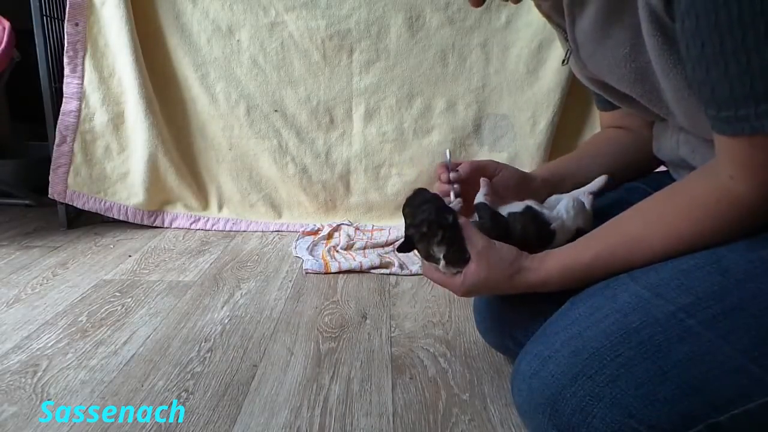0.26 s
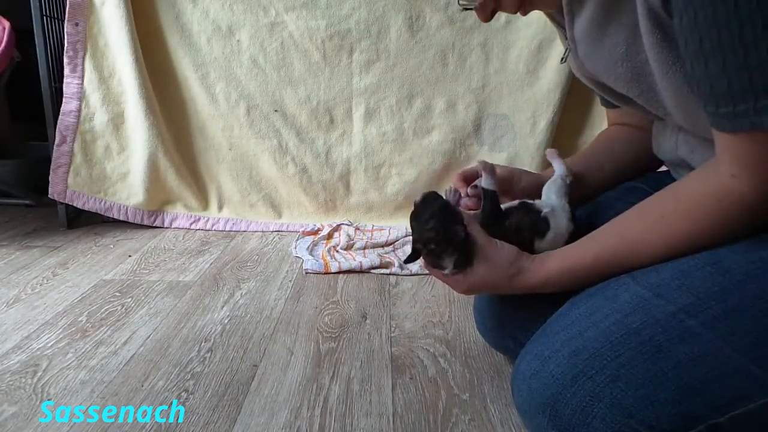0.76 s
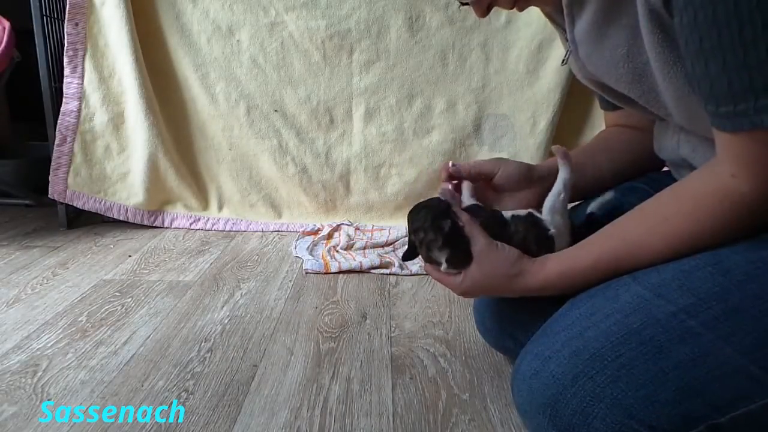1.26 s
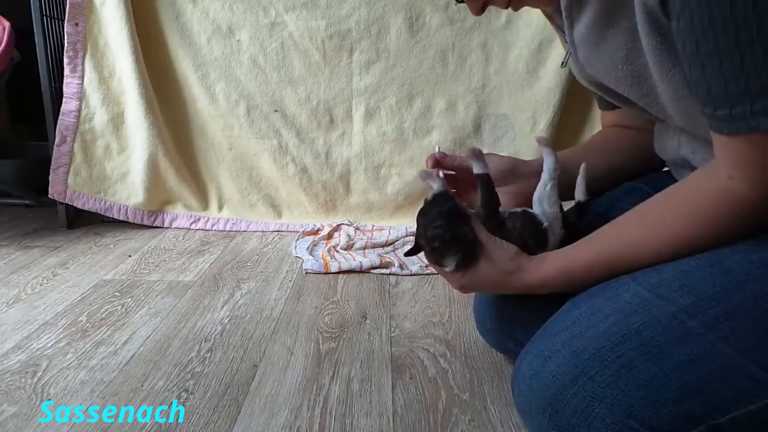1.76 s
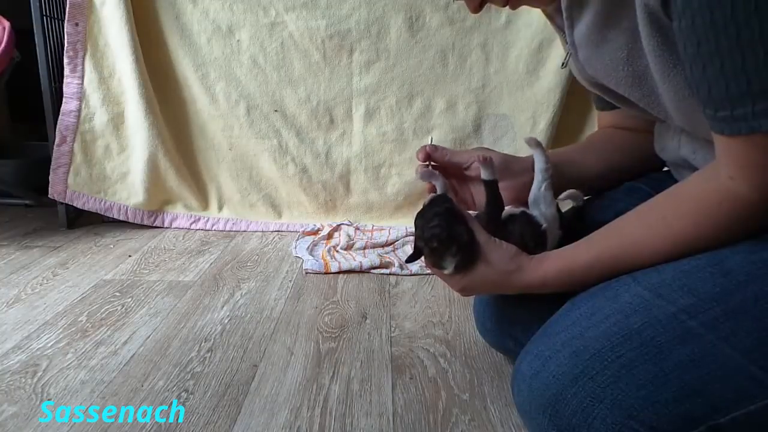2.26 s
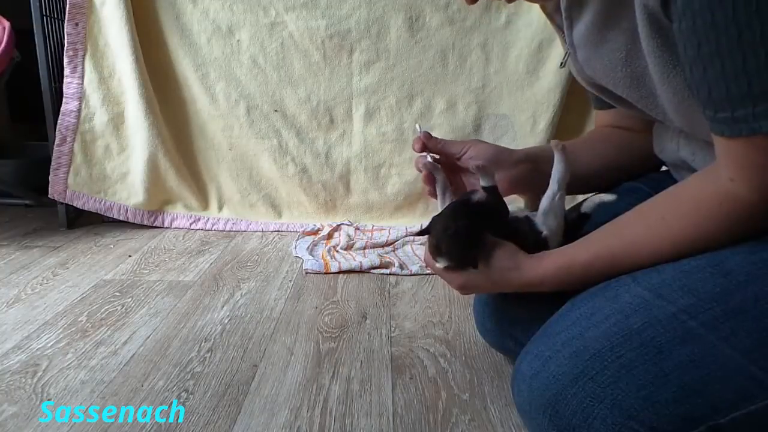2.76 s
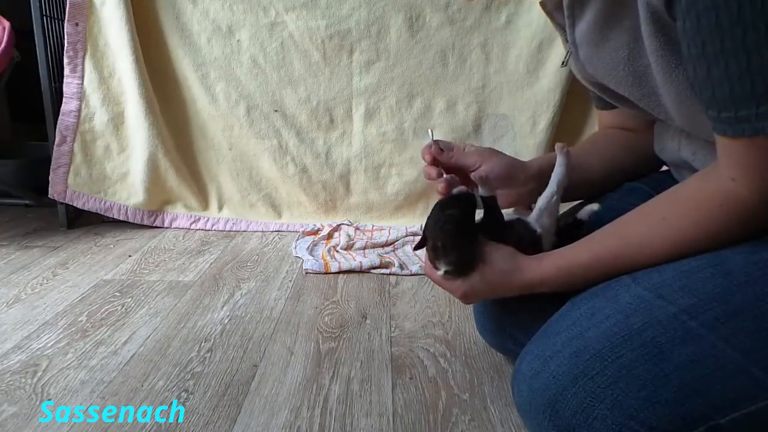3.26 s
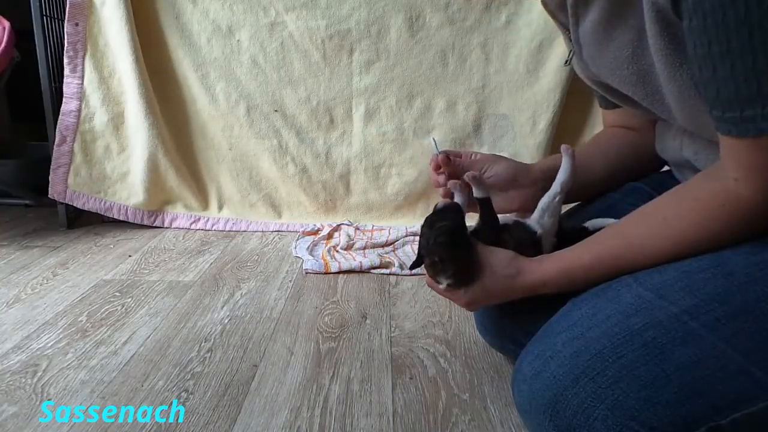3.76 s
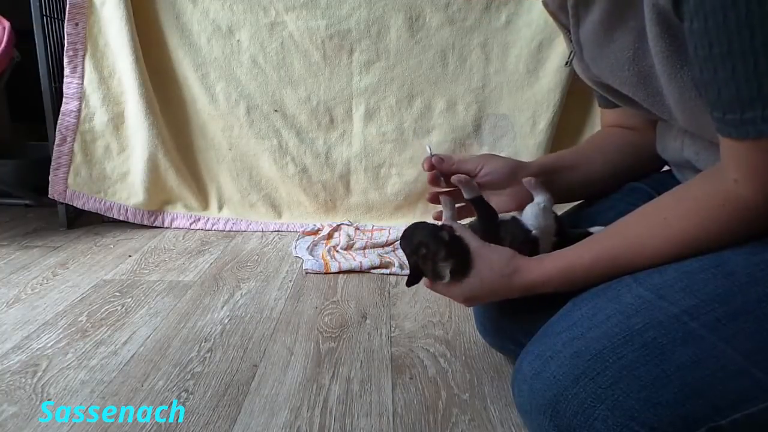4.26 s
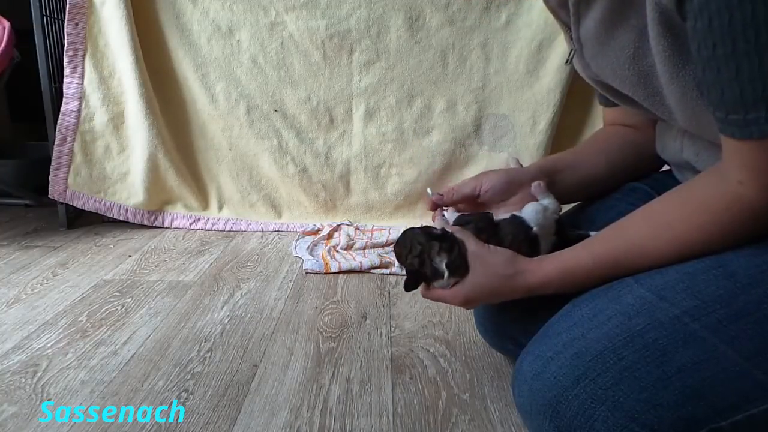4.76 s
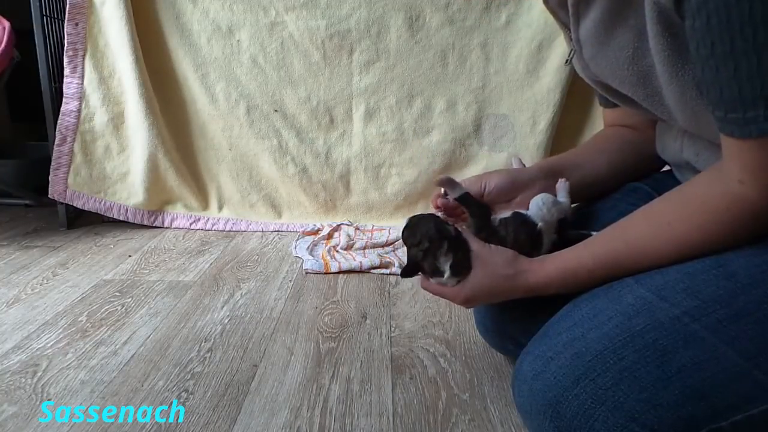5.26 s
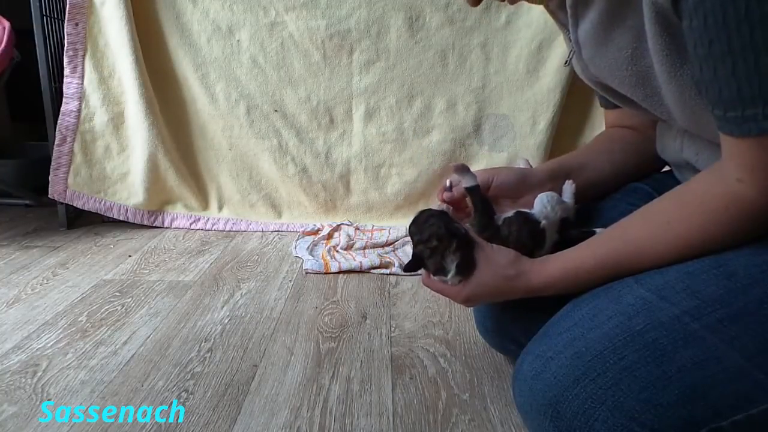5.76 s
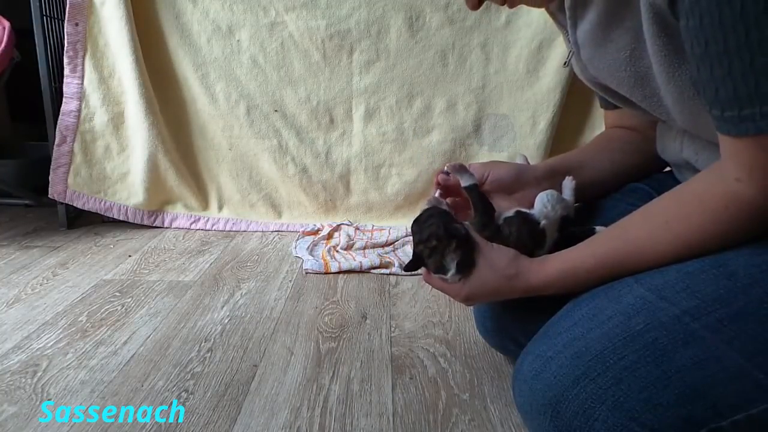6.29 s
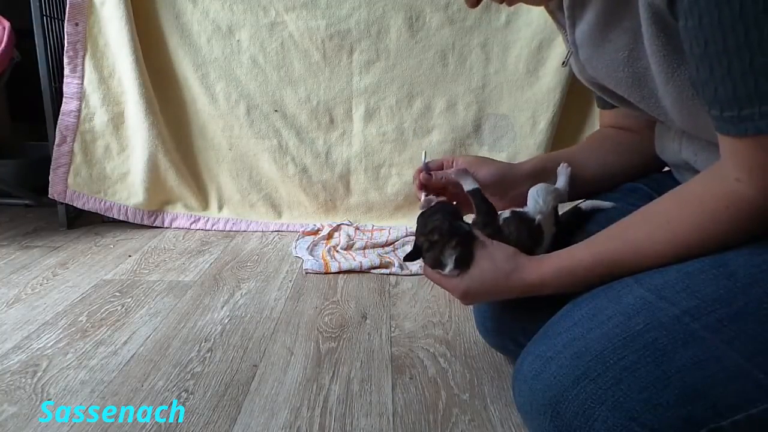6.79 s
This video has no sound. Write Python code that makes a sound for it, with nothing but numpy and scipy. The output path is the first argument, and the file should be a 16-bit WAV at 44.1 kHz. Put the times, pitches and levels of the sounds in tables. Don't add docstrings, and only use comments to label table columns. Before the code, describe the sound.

In a bare room with a hard floor, a newborn puppy is handled. A short low grunt opens, a very faint one follows at 0.4 s, then a weak moan sweeps up and down at 0.7 s. A thin high cry comes at 1.2 s. Muffled, hoarse grunts follow at 1.6, 1.9 and 2.2 s, with dull cloth bumps, and a bending moan at 2.5 s. A weak squeal at 2.9 s leads to a strong, piercing one at 3.3 s and a longer falling one from 3.8 to 4.2 s. After a low moan at 4.5 s, a louder moan leaps up at 5 s with a soft thud. The loudest squeal bursts out at 5.4 s after a quick upward swoop; weaker cries follow at 5.9 and 6.4 s, then a sharp strong one at 6.8 s. Cries end in brief croaks. Short echoes trail, and faint hum and hiss sink between calls.

```python
import sys
import numpy as np
from scipy import signal
from scipy.fft import rfft, irfft, next_fast_len
from scipy.io import wavfile
from scipy.ndimage import uniform_filter1d

SR = 44100
rng = np.random.default_rng(int(sys.argv[2]) if len(sys.argv) > 2 else 0)


def elevation(decibels):
    levels = np.asarray(decibels, float)
    return 10 ** (levels / 20)


def generate_wav(signal):
    frames = np.transpose(np.atleast_2d(signal))
    scaled = np.clip(frames, -1, 1) * 32767
    pcm = np.round(scaled).astype(np.int16)
    wavfile.write(sys.argv[1], SR, pcm)


N = 310023
TOP_HZ = 14560


def unit(x):
    return x / np.sqrt(np.mean(x ** 2) + 1e-20)


def along(points, hz):
    f, v = np.transpose(points)
    return np.interp(np.log(hz + 1), np.log(f + 1), v)


def filtered(x, response):
    m = next_fast_len(len(x) + 8192)
    return irfft(rfft(x, m) * response(np.fft.rfftfreq(m, 1 / SR)), m)[:len(x)]


def noise(spectrum):
    return unit(filtered(rng.standard_normal(N), lambda hz: elevation(along(spectrum, hz))))


def wobble(rate):
    return unit(filtered(rng.standard_normal(N), lambda hz: np.exp(-(2 * hz / rate) ** 2)))


def voice(calls, mouth, breath, breath_db, high_gain_db, muffle_db, fade, order):
    out = np.zeros(N)
    air = noise(breath)
    shake, flutter, drift = wobble(350), wobble(220), wobble(70)
    k = np.arange(4, 11)[:, None]

    def muffled(hz):
        return muffle_db / (1 + (2700 / hz) ** 8)

    for rows, colour, hoarse in calls:
        octave_db, octave_gain_db, twelfth_db, higher_db, grows = colour
        s, *cols = np.transpose(rows)
        s = np.maximum.accumulate(s)
        at = np.arange(max(round(s[0] * SR), 0), min(round(s[-1] * SR), N))
        t = at / SR
        pitch, first_db = (np.interp(t, s, c) for c in cols)

        opening = at < at[np.argmax(first_db > first_db.max() - 3)]
        slack_db = (grows + 0.69 * opening) * (first_db - first_db.max())
        fall_octaves = np.log2(pitch.max() / pitch) * (at > at[pitch.argmax()])
        second_db = first_db + octave_db + octave_gain_db * fall_octaves + muffled(2 * pitch)
        third_db = first_db + twelfth_db + 0.41 * slack_db + muffled(3 * pitch)
        high_db = first_db + higher_db + slack_db + muffled(order * pitch)

        glide = uniform_filter1d(np.abs(np.gradient(np.log2(pitch))) * SR, SR // 50)
        rough = np.minimum(hoarse * (1 + np.exp((s[0] - t) / 0.15)) + .009 * glide, .6)
        phase = 2 * np.pi * np.cumsum(pitch * (1 + .009 * drift[at])) / SR
        phase = phase + .7 * rough * shake[at]

        colour_db = along(mouth, k * pitch) - along(mouth, order * pitch)
        high_level = elevation(high_db + high_gain_db + colour_db) * (k * pitch < TOP_HZ)
        upper = np.sum(high_level * np.sin(k * phase + k * k), axis=0)
        low = elevation(first_db) * np.sin(phase)
        low = low + elevation(second_db) * np.sin(2 * phase + 1)
        low = low + elevation(third_db) * np.sin(3 * phase)

        effort_db = np.max([first_db, second_db, third_db], axis=0)
        puffs = rough * elevation(effort_db + breath_db) * air[at] * (1 + 0.31 * np.cos(phase))
        edges = np.clip(np.minimum(t - s[0], s[-1] - t) / fade, 0, 1)
        out[at] += edges * (1 + rough * flutter[at]) * (np.sqrt(2) * (low + upper) + puffs)
    return out


def squeals():
    # t/s, pitch f/Hz, level/dB
    early_cries = [
        [(1.12, 1836, -80), (1.14, 1590, -60.5), (1.185, 1757, -65.5), (1.201, 1787, -37.5),
         (1.25, 1856, -43.5), (1.262, 1989, -40.5), (1.29, 2042, -44), (1.332, 1832, -59), (1.39, 983, -67)],
        [(2.89, 1515, -62.5), (2.93, 1783, -56), (2.976, 1848, -47.5), (3.052, 1625, -55), (3.072, 1335, -51)],
        [(3.25, 1231, -73), (3.29, 1631, -49), (3.314, 1657, -46), (3.322, 1846, -36.5), (3.336, 2148, -29.5),
         (3.412, 2245, -35), (3.48, 2075, -42), (3.536, 1780, -45.5), (3.558, 1355, -47)],
        [(3.73, 1118, -61), (3.764, 1885, -50), (3.82, 2170, -42), (3.842, 2387, -30), (3.882, 2237, -44),
         (3.97, 2018, -41), (4.049, 1941, -54.5), (4.189, 1913, -51), (4.215, 1262, -54)],
    ]
    late_cries = [
        [(5.365, 1680, -46.5), (5.397, 1730, -45), (5.407, 2050, -30), (5.435, 2095, -24.5), (5.462, 2110, -24),
         (5.485, 1980, -31), (5.512, 1770, -43), (5.55, 1456, -45.5)],
        [(5.85, 1790, -45.5), (5.86, 1696, -53), (5.916, 1922, -43), (5.962, 1890, -51), (5.995, 1760, -51.5),
         (6.03, 1484, -52.5)],
        [(6.35, 1867, -56.5), (6.412, 1730, -48.5), (6.474, 1586, -57), (6.487, 1273, -40)],
        [(6.69, 1107, -63.5), (6.74, 1763, -50), (6.772, 1603, -50.5), (6.778, 1913, -55), (6.791, 1982, -29.5),
         (6.832, 2020, -28), (6.855, 1925, -31.5), (6.885, 1648, -46), (6.925, 1394, -52.5)],
    ]
    # octave/dB, octave gain/dB per octave of fall, twelfth/dB, higher partials/dB,
    # their extra/dB per dB of effort; levels are against the fundamental
    cry_colours = [(-10, -0.5, -8, -11, 0.36), (-26.5, 40, -25, -18, 0.12), (-23.5, 0.5, -20, -8, 1),
                   (-22, -17.5, -34, -13.5, .15), (-33.5, 39, -28.5, -13, 0.36), (-35, 28, -32, -8.5, 1),
                   (-29.5, 16, -26, -17.5, 0.26), (-30, 89.5, -14.5, -13, 0.05)]
    cry_roughness = [.07, .09, .125, .14, .05, .07, .12, .075]
    # f/Hz, level/dB
    gape = [(3000, -5.5), (5000, -6), (6500, -8.5), (8000, -14), (10500, -1.5), (12500, -9.5),
            (14500, -23.5)]
    # f/Hz, level/dB per Hz
    hiss = [(500, -12), (2000, -0.5), (3500, -9.5), (6000, -15.5), (8000, -24), (10500, -4), (14500, -7.5)]
    calls = zip(early_cries + late_cries, cry_colours, cry_roughness)
    return voice(calls, gape, hiss, breath_db=-10, high_gain_db=-10.0, muffle_db=0.5, fade=0.0013, order=5)


def swoops():
    # t/s, length/s, start f/Hz, end f/Hz, level/dB
    swoop_list = [
        (5.3, 0.082, 404, 1110, -51),
        (5.768, 0.095, 388.2, 1128, -48),
        (6.226, .12, 408.8, 1497, -50.5),
    ]
    # share of length, share of the rise, level/dB against the table above
    swoop_path = [(0, 0.22, -14.5), (.27, .22, -10), (.75, .87, -1), (1, 1, -4.5)]
    calls = []
    for s, length, from_hz, to_hz, db in swoop_list:
        course = [(s + u * length, from_hz * (to_hz / from_hz) ** rise, db + rel_db)
                  for u, rise, rel_db in swoop_path]
        calls.append((course, (0.5, 0, -6, -31, 0), .22))
    return calls


def croaks():
    # t/s, pitch f/Hz, level/dB, overtones/dB, twelfth/dB against the fundamental
    croak_list = [(3.075, 881, -58, 9, 8.5), (3.557, 1250, -53, -4.5, -13.5), (4.215, 1240, -53, -8, -12),
                  (5.55, 707, -50, 3.5, -11), (6.028, 761, -49.5, 5.5, -20), (6.483, 922, -51.5, -5, -13),
                  (6.923, 735.5, -52.5, 4.5, 5)]
    # share of length, pitch as a ratio, level/dB against the table above
    croak_path = [(0, 1.015, -4.5), (.55, .99, -4), (1, .97, -25.5)]
    length = 0.069
    calls = []
    for s, hz, db, over_db, twelfth_db in croak_list:
        course = [(s + u * length, hz * ratio, db + rel_db) for u, ratio, rel_db in croak_path]
        calls.append((course, (-4 + over_db, 0, twelfth_db, -13.5 + over_db, 0), .21))
    return calls


def moans():
    # t/s, pitch f/Hz, level/dB
    moan_paths = [
        [(.71, 427.6, -71), (.746, 450.7, -61), (.782, 690, -59), (.86, 1390, -61), (.9, 1437, -64),
         (.93, 1004, -57), (.96, 890, -88)],
        [(2.48, 335.5, -73), (2.514, 313.4, -57), (2.548, 343.5, -59), (2.56, 621, -59.5), (2.596, 987, -59.5),
         (2.63, 1092, -58), (2.71, 622, -61.5), (2.73, 598, -68)],
        [(4.43, 342, -69.5), (4.478, 391, -55.5), (4.512, 440, -55.5), (4.592, 504.7, -53.5),
         (4.64, 449.6, -49), (4.66, 432.4, -48), (4.745, 411.5, -53.5), (4.77, 398, -101)],
        [(4.88, 313.5, -72), (4.91, 323.2, -56.5), (4.962, 469.6, -51.5), (4.972, 664, -55.5),
         (5.018, 1213, -50.5), (5.07, 1143, -41), (5.102, 789, -53), (5.17, 563.6, -58.5)],
    ]
    # octave/dB, octave gain/dB per octave of fall, twelfth/dB, higher partials/dB,
    # their extra/dB per dB of effort; levels are against the fundamental
    moan_colours = [(-2.5, -5, -8, -32, 4.5), (-8, -7, -18, -33, -3.5), (-3, -25, -19, -25.5, -1.14),
                    (-1, -3.5, -5.5, -17, 0)]
    return list(zip(moan_paths, moan_colours, [.35, .19, .09, .3]))


def grunts():
    # t/s, length/s, top pitch f/Hz, level/dB, octave/dB against the fundamental
    grunt_list = [(-.04, 0.19, 358, -54.5, -2), (0.364, .14, 308.2, -70.5, 12),
                  (1.598, .17, 305.4, -68, -5.5), (1.889, .14, 323.3, -60, -3.5),
                  (2.167, .2, 296.8, -59.5, 1)]
    # share of length, pitch as a ratio of the top, level/dB against the table above
    grunt_path = [(0, .9, -3.5), (.15, .94, -4), (.4, 0.98, 1.5), (.85, 0.98, -2.5), (1, 0.64, -24)]
    calls = []
    for (s, length, hz, db, octave_db), hoarse in zip(grunt_list, [.13, .14, .3, .22, .3]):
        course = [(s + u * length, hz * ratio, db + rel_db) for u, ratio, rel_db in grunt_path]
        calls.append((course, (octave_db, -150, -8.5 + 1.03 * octave_db, -22, 0), hoarse))
    return calls


def low_voice():
    # f/Hz, level/dB
    dull_mouth = [(1000, 48), (1400, 29), (1800, 0.5), (2400, 9), (3300, -14), (4800, -32.5), (6200, -29),
                  (8000, -24), (10500, -12), (14500, -26.5)]
    # f/Hz, level/dB per Hz
    hoarse_air = [(100, -28.5), (350, -4.5), (1000, -3), (1400, -10.5), (2300, -9), (3200, -21),
                  (6000, -49), (14500, -43.5)]
    calls = moans() + grunts() + swoops() + croaks()
    return voice(calls, dull_mouth, hoarse_air, breath_db=-2, high_gain_db=2.5, muffle_db=-19.5,
                 fade=0.004, order=4)


def handling():
    # t/s, thud level/dB, rustle level/dB against the thud, length/s
    touches = [(1.604, -49, -28, 0.038), (1.709, -47.5, -9.5, 0.037), (2.21, -42.5, -32, 0.13),
               (2.463, -46.5, -28, 0.054), (3.185, -55.5, 8.5, 0.093), (4.146, -53.5, -6.5, 0.08),
               (4.203, -57.5, 7.5, 0.072), (4.988, -35.5, -20.5, 0.066), (5.052, -39, -12.5, 0.013),
               (5.154, -48, -16, 0.086), (6.915, -45.5, 11.5, 0.02)]
    thud = noise([(40, -27.5), (90, -10.5), (200, -0.5), (400, -0.5), (900, -54.5)])
    rustle = noise([(500, -32.5), (2500, 3), (9000, 0), (14500, -9.5)]) * elevation(1.8 * wobble(200))
    t, out = np.arange(N) / SR, np.zeros(N)
    for s, db, rustle_db, length in touches:
        swell = np.exp(-((t - s - length / 2) / max(length / 2, .005)) ** 2)
        out += elevation(db - 15) * swell * (thud + elevation(rustle_db) * rustle)
    return out


def floor_bounce(x):
    notch_hz, width_hz, depth_db = 496.4, 22, -12
    return filtered(x, lambda hz: elevation(depth_db / (1 + ((hz - notch_hz) / width_hz) ** 2)))


def facing_away(x):
    # f/Hz, level/dB
    head_shadow = [(500, 3), (2000, 1.5), (4000, -1.5), (12000, -7.5)]
    return filtered(x, lambda hz: elevation(along(head_shadow, hz)))


def room(x, block=16384):
    # f/Hz, time to fade by 60 dB/s
    fade_times = [(200, 0.34), (2000, 0.34), (6000, 0.34), (13000, 0.26)]
    out, window = np.zeros(N + 2 * SR), np.hanning(2 * block)
    hz, t, z = signal.stft(rng.standard_normal((N // block + 2, SR // 2)), SR, nperseg=256)
    fading = elevation(-60 * t / along(fade_times, hz)[:, None])
    tails = signal.istft(z * fading, SR, nperseg=256)[1]
    for start, tail in zip(range(-block, N, block), tails):
        at = np.arange(max(start, 0), min(start + 2 * block, N))
        wet = signal.fftconvolve(x[at] * window[at - start], tail / np.linalg.norm(tail))
        out[at[0] + 150:][:len(wet)] += wet
    return out[:N]


def background():
    # f/Hz, level/dB per Hz
    quiet_room = [(15, -35.5), (25, -18), (63, -7.5), (137, -4), (493, -13.5), (661, -14.5), (910, -15),
                  (1290, -18.5), (1720, -29.5), (1870, -23), (2860, -28), (14500, -27.5)]
    # f/Hz, width/Hz, first level/dB, last level/dB
    appliances = [
        (128.5, 32, -69, -71.5),
        (150, 31, -80.5, -67.5),
    ]
    drones = np.zeros(N)
    for hz, w, first_db, last_db in appliances:
        level_db = np.linspace(first_db, last_db, N) + 4.5 * wobble(3.7)
        drones += elevation(level_db) * noise([(hz - 3 * w, -40), (hz, 0), (hz + 3 * w, -40)])
    return elevation(-62.0 + 0.64 * wobble(3.41)) * noise(quiet_room) + drones


def scene():
    near = floor_bounce(squeals() + low_voice()) + handling()
    return (facing_away(near) + elevation(3.5) * room(near) + background())[None]


def band_limit(x):
    return signal.sosfilt(signal.butter(12, 15000, fs=SR, output="sos"), x)


def record(dry):
    band = filtered(dry[0], lambda hz: (hz > 260) * (hz < 4000))
    power = np.abs(uniform_filter1d(band ** 2, round(0.026 * SR)))
    level_db = 10 * np.log10(power + 1e-12)
    opening = 1 / (1 + np.exp(-(level_db + 55.0) / 2.88))
    gain_db = -12 * (1 - uniform_filter1d(opening, round(0.032 * SR)))
    mix = filtered(dry[0] * elevation(gain_db), lambda hz: hz < TOP_HZ)[None]
    return band_limit(mix)


dry = scene()
out = record(dry)
generate_wav(out)
```